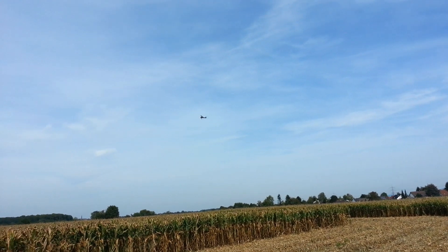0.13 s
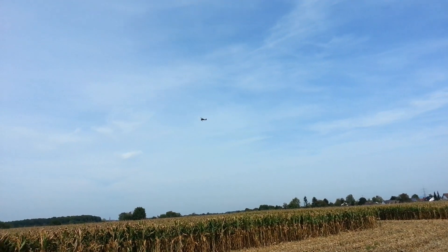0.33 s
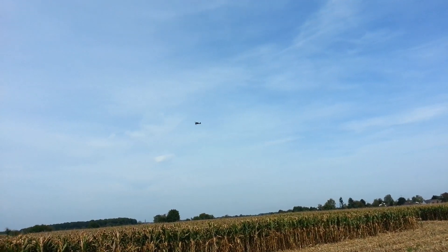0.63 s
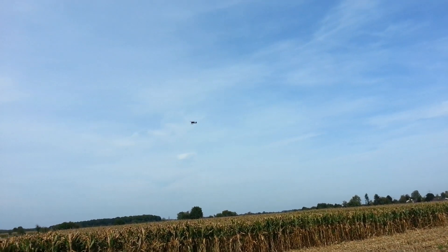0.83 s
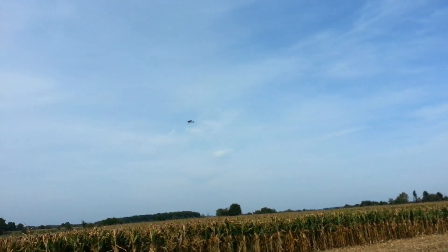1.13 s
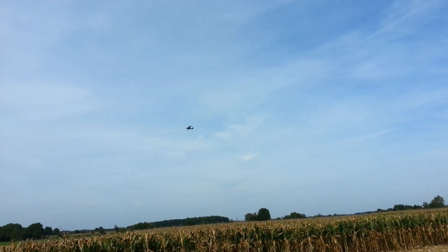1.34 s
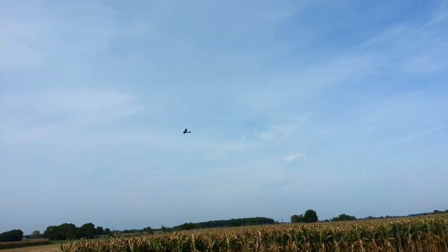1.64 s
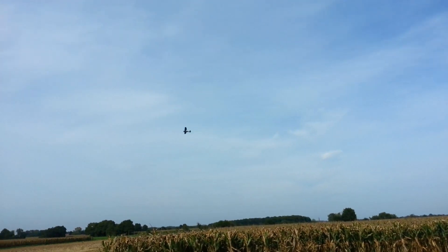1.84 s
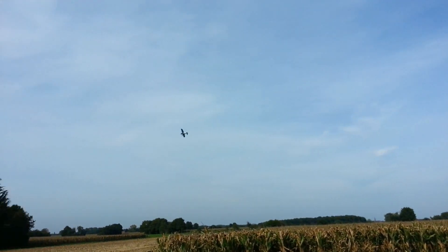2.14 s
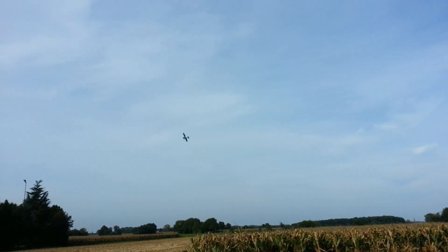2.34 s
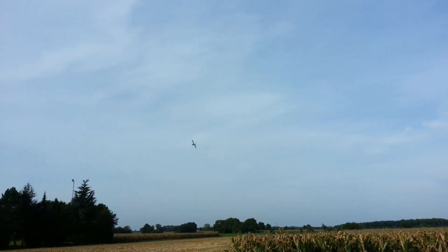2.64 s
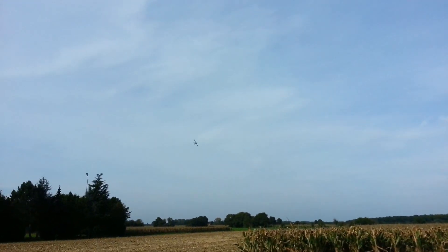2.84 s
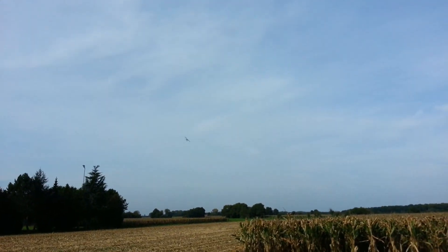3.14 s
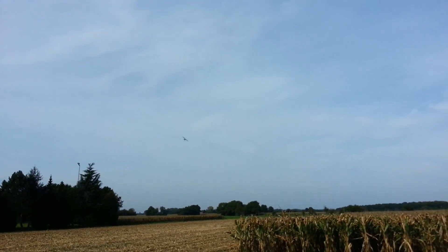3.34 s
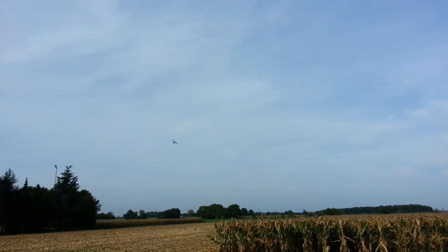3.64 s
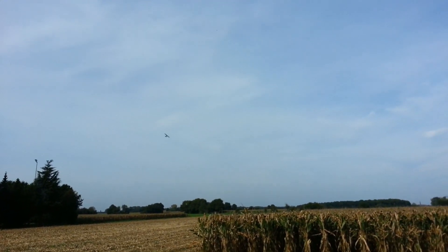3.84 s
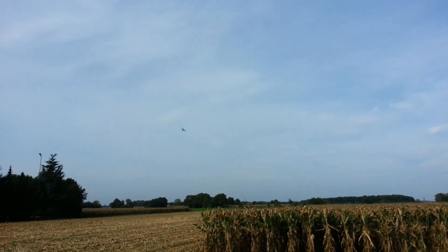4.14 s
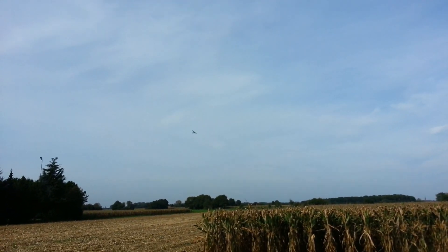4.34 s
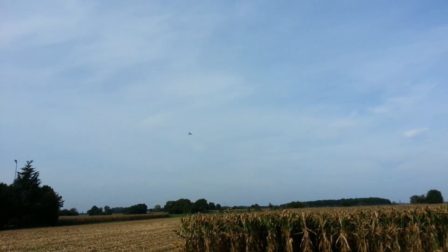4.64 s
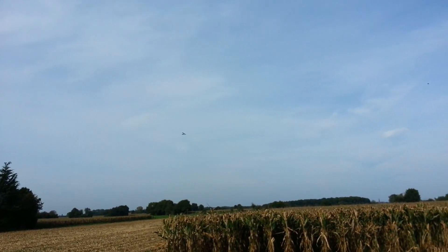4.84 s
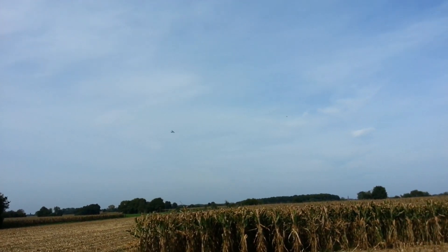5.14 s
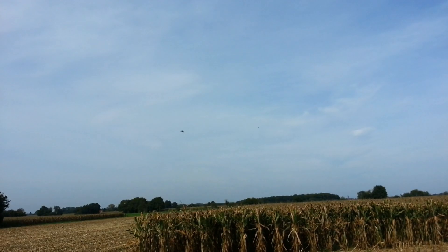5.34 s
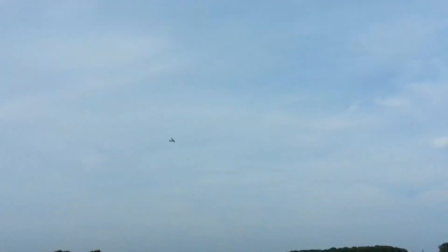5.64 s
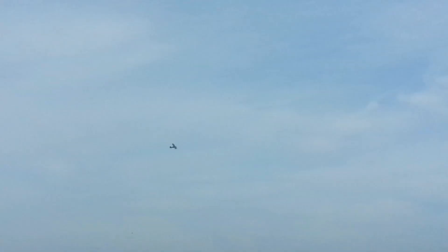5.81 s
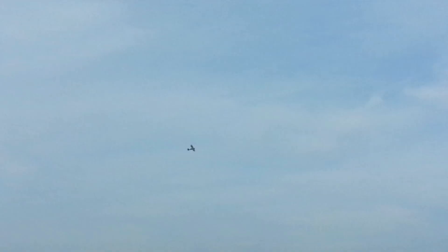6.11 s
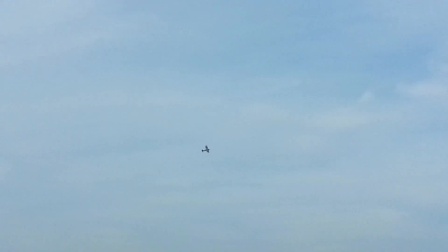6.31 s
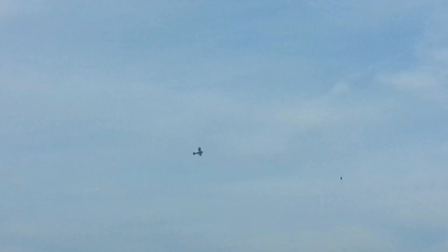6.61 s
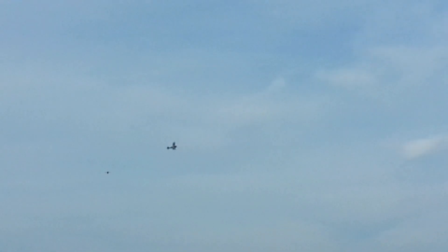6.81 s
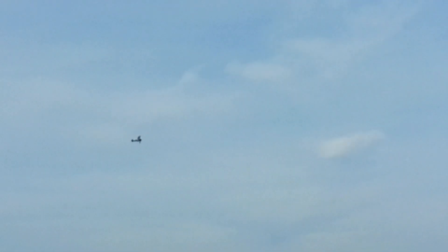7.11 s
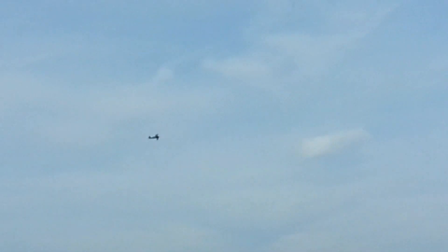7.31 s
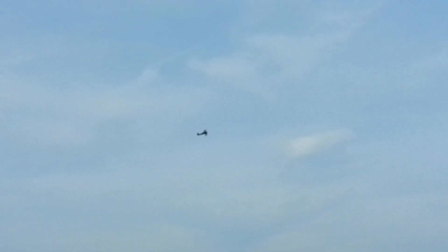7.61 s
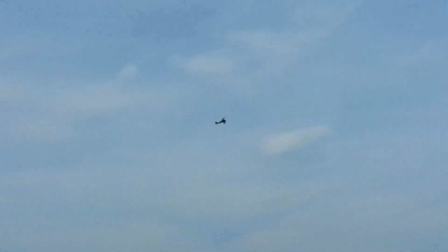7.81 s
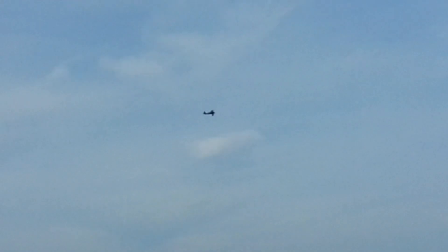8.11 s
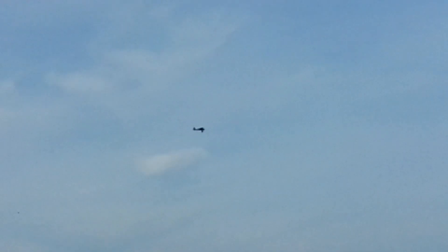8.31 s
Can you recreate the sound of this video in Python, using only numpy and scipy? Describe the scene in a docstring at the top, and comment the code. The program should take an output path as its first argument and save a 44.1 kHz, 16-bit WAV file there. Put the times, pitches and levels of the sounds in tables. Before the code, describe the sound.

A car passes close behind a hand-held microphone on a country road. Its tyres roar on rough tarmac, swelling as it jolts and rattles over bumps, with a low exhaust boom, then fading as it rolls far away. Fingers tick and slide on the casing. In the second half a breeze thumps on the left side and a distant model plane whines very faintly over a soft hiss.

```python
"""On a country road, a car passes behind a hand-held camera and rolls far away. Its tyres roar on the
rough tarmac, it jolts and rattles over bumps, its exhaust booms and its engine hums. The roar reaches
one of the camera's two microphone ports (small openings) first, then the other. Fingers tick and slide
on the camera shell, a breeze thumps on the left port, a far model plane whines and the microphone
hisses."""
import sys
import numpy as np
from scipy import signal
from scipy.fft import rfft, irfft, next_fast_len
from scipy.io import wavfile
from scipy.ndimage import uniform_filter1d, map_coordinates

SR = 44100
rng = np.random.default_rng(int(sys.argv[2]) if len(sys.argv) > 2 else 0)


def dump(signal):
    """Clip the signal to [-1, 1] and save it as 16-bit WAV at the path in sys.argv[1]."""
    limited = np.clip(np.atleast_2d(signal).T, -1, 1)
    pcm = np.round(limited * 32767).astype(np.int16)
    wavfile.write(sys.argv[1], SR, pcm)


N = 373086


# How loud and how deep or bright the roar is: t/s, level/dB, bass lift/dB, treble lift/dB
ROAR_LEVELS = [(0, -32, 2, -2.5), (.5, -30.5, 1, -2.5), (.8, -27.5, 5, -1), (1.05, -28.5, 8.5, 1.5),
               (1.4, -27.5, 7.5, 2), (1.62, -26.5, 3.5, 0.5), (1.8, -23.5, 4.5, -0.5),
               (1.98, -25.5, 11.5, 1.5), (2.2, -23.5, 6, -0.5), (2.48, -19, -0.5, -2),
               (2.63, -23.5, 2, 2.5), (2.85, -21, 2, 0.5), (3.1, -25.5, -1, 1.5), (3.5, -28, -1.5, 0.5),
               (4.2, -29.5, -1.5, 2.5), (4.45, -29.5, 1.5, 4.5), (5.5, -36, 0, 2), (6.2, -35.5, -3, 1.5),
               (7.2, -36, -2.5, 1), (8.46, -39.5, -3, -1.5)]
# The bass of the roar, alike on both ports: f/Hz, gain/dB
ROAR_BASS = [(20, -33), (60, -28), (130, -11), (220, -3), (300, -1), (360, -2), (440, 2), (520, -1),
             (640, -1.5)]

def car():
    """The roar swells, changes tone and fades as the car comes, passes and leaves."""
    pass_s, abeam_s = 2.26, 0.55  # closest moment; distance to the road divided by speed
    frames = dict(fs=SR, nperseg=2048, noverlap=1536)
    hz, t, spectra = signal.stft(tyres(), **frames)
    f = hz[:, None]
    level_db, bass_db, treble_db = curves(ROAR_LEVELS, t)
    away = (t - pass_s) / np.hypot(t - pass_s, abeam_s)  # -1 coming, 0 closest, 1 leaving
    db, lead = roar_tone(hz, t)
    db += along(ROAR_BASS, hz)[:, None] + bass_db / (1 + (f / 450) ** 4)
    db += treble_db / (1 + (2600 / (f + 1)) ** 6)
    db -= 65 * np.log2(np.maximum(f / 6000, 1))  # air and rubber pass little above 6000 Hz
    db += exhaust_boom(f, t, away) + swelling_bands(f, t) - hand_shade(f, t)
    patches = uniform_filter1d(rng.standard_normal(db.shape[1:]), size=14, axis=0)
    patches = uniform_filter1d(patches, size=12, axis=1)
    gain = amp(db + 0.8 * patches / patches.std())  # the tone flickers a little
    mid_power = np.sum(gain[:, 23:116] ** 2, axis=(0, 1)) / 2 / len(hz)  # about 500-2500 Hz
    gain *= amp(level_db) / np.sqrt(mid_power)
    return signal.istft(reach_ports(spectra, hz, t, away, lead) * gain, **frames)[1][:, :N]


# Jolts over bumps: t/s, jump in level/dB, time to die away by 60 dB/s
BUMPS = [(1.76, 6.5, 0.16), (1.831, 5, 0.091), (1.917, -2, .06), (1.99, 1.5, 0.037), (2.317, 4, 0.071),
         (2.502, 6.5, 0.13), (2.596, 4.5, 0.1), (2.739, 3, 0.074), (2.755, 5, 0.1), (2.841, 6.5, 0.15),
         (2.915, 3.5, 0.12)]
# The car body knocks at the hardest bumps: t/s, level against the roar/dB, f/Hz
BODY_KNOCKS = [(1.7635, 0, 900), (2.5032, 5, 1600), (2.7395, 5, 1300), (2.7585, 0, 900), (2.8430, 14, 1800),
               (2.8436, 0, 1100), (2.8600, -2, 700), (2.919, 2, 1500)]

def tyres():
    """Rough tarmac makes grainy noise that leaps at bumps. Rows: shared, left only, right only."""
    t, surge = np.arange(N) / SR, np.zeros(N)
    for s, db, fade_s in BUMPS:
        surge += (amp(db) - 1) * amp(-60 * np.abs(t - s) / fade_s) * np.clip((t - s) / 0.01, 0, 1)
    grain = amp(1.08 * wobble(320) + 0.47 * wobble(25) + 0.5 * wobble(7))
    roar = unit(grain * rng.standard_normal((3, N)))
    dull_hz, treble_share = 2300, 0.39  # a jolt is dull: only part of the treble leaps
    roar += filtered(surge * roar, lambda f: treble_share + (1 - treble_share) / (1 + (f / dull_hz) ** 6))
    for s, db, hz in BODY_KNOCKS:
        start = round(s * SR)
        roar[:, start:start + 600] += ring(db, hz, t[:600], cycles=5)
    return roar


# The roar's tone at four places on the road: f/Hz, left gain/dB, right gain/dB, left phase lead/rad
TONE_NEARING = [(576, -2.5, -2.5, 0.033), (696, 1.5, 5.5, -0.075), (880, 5, 4, 0.26), (1100, 6, 5, 0.57),
                (1440, 3.5, 1.1, -0.18), (1810, 5.5, 4.5, -0.27), (2050, -2, -9, -0.08),
                (2240, -5.5, -3.5, -0.94), (2820, -7.5, -8, 0.13), (2890, -6, -5, 0.73),
                (3340, -5, -13.5, -0.95), (4340, -10.5, -13, -0.51), (5110, -12, -16.5, 0.78),
                (5900, -36, -19, -0.13)]
TONE_PASSED = [(544, -3.5, -3, 0.0), (735, 4.5, 5, 0.94), (890, 2.5, 2.5, 0), (1100, 1.5, 6.5, 0.5),
               (1380, -4, 0, 1.8), (1730, 0, -7, 0.35), (2060, -3.5, -6.5, 0.0), (2400, -15.5, -10, 0),
               (2680, -6, -21, -0.3), (2980, -12, -26, 7), (3470, -10.5, -11.5, -0.5),
               (4270, -10, -15.5, -1), (5140, -24, -26.5, 2), (6000, -33, -24.5, 3.5)]
TONE_LEAVING = [(560, 0.8, 1, -0.0052), (726, 1.5, -1.5, -0.86), (900, -3.5, 6, -0.18),
                (1130, 3, 8.5, 0.21), (1390, -1, 3, -0.12), (1790, 1, 2.5, -0.61), (2070, -8.5, -1, 0.1),
                (2410, -9, -6.5, 0.58), (2730, -14, -18, 0.6), (2970, -9.5, -21.5, 0.32),
                (3430, -10.5, -22.5, -0.6), (4270, -13, -17.5, 1), (5120, -21, -30, -0.46),
                (6000, -23.5, -27.5, -1.1)]
TONE_FAR = [(600, 0, 1, -0.094), (695, 0, 3.5, -0.57), (870, 2.5, 4, 0.17), (1080, 3.5, 2, 0.27),
            (1360, 3.5, 3.5, -0.55), (1770, -10, -5, -0.058), (2010, -5.5, -3, 1), (2360, -5, -10, 0.56),
            (2680, -10.5, -12, -0.35), (2900, -12, -12, -0.35), (3420, -12.5, -22, -0.85),
            (4110, -13.5, -19.5, -1.34), (4860, -20, -24.5, -1.6), (6000, -35, -28.5, -2)]
# When each of those tones is fully reached: t/s
TONE_TIMES = [1.7, 2.35, 3.7, 6.6]

def roar_tone(hz, t):
    """One tone blends into the next as the car moves along the road."""
    tones = (TONE_NEARING, TONE_PASSED, TONE_LEAVING, TONE_FAR)
    place = np.interp(t, TONE_TIMES, np.arange(len(tones)))
    weights = [np.clip(1 - np.abs(place - k), 0, 1) for k in range(len(tones))]
    left_db, right_db, lead = sum(along(tone, hz)[..., None] * w for tone, w in zip(tones, weights))
    return np.array([left_db, right_db]), lead


# Strength of the boom with the car coming, closest and leaving: lift/dB
BOOM_LIFTS = [13, 8, 11.5]

def exhaust_boom(f, t, away):
    """The exhaust lifts one narrow, wavering bass band, lower once the car has passed (Doppler effect)."""
    boom_hz, doppler = 308, 0.05  # pitch when closest; car speed divided by the speed of sound
    samples = np.minimum(t * SR, N - 1).astype(int)
    lift_db = np.interp(away, [-1, 0, 1], BOOM_LIFTS) + 1.5 * wobble(3)[samples]
    pitch_hz = boom_hz * (1 - doppler * away) + 4 * wobble(4)[samples]
    return lift_db * bell(f - pitch_hz, width=20)


# Three bands of the roar: t/s, left f/Hz, right f/Hz, left lift/dB, right lift/dB
LOW_SWELL = [(.2, 1750, 1800, 3, 0), (1, 1760, 1740, 4, 6), (1.9, 1790, 1750, -0.5, 4),
             (2.15, 900, 835, 5.5, 4), (2.6, 1150, 1350, 6, 3.5), (2.9, 1520, 1490, 2.5, 1.5),
             (3.5, 1520, 1760, 2, 2.5), (4.2, 1590, 1950, 2, 1), (4.6, 1200, 1070, 4, 2),
             (5.8, 1100, 1000, 2.5, 0), (6.5, 1100, 2060, -1, 0), (7.3, 980, 1000, 2.5, 0.5),
             (7.9, 1030, 1010, 4, 3), (8.4, 1530, 1720, 3.5, 3.5)]
MID_SWELL = [(.2, 3200, 3280, 1, 8), (.7, 3760, 3260, -10, 5), (1.1, 3500, 3300, -9, 2),
             (1.6, 3200, 3300, -1.5, 2.5), (2.1, 3200, 3300, 1.5, 1.5), (2.8, 3200, 3500, -1, -3),
             (3.5, 3400, 3480, 0, 9), (4.1, 3200, 3500, 1, 10), (4.4, 3100, 3500, 1, 12),
             (4.75, 3300, 3800, -7, 1), (5.1, 3500, 3600, 2.5, 2), (5.6, 3550, 3500, 7.5, 11),
             (6.2, 3400, 3500, -1.5, 4), (7.1, 3000, 3500, 1, 7), (7.6, 2860, 3380, 12.5, 12),
             (8.1, 2800, 3200, 4, 4)]
HIGH_SWELL = [(.2, 4500, 4500, 1, 3), (.6, 4770, 4300, -16, 2), (1, 4400, 4800, -2, 4),
              (1.35, 4400, 4350, -3, 5.5), (1.8, 4500, 4520, -8, 5.5), (2.3, 4000, 4300, 2.5, 1),
              (2.8, 4470, 4900, -4.5, -6), (3.5, 4330, 4480, 4.5, 3), (3.9, 4210, 4600, 2.5, 1),
              (4.35, 4070, 4600, 3.5, 3), (4.75, 4270, 4300, -7, -6), (5.3, 4380, 4300, 1, -2),
              (5.7, 4500, 4250, 6.5, 7), (6.3, 4330, 4500, 0, -1), (7.1, 4050, 4300, 6, 5),
              (7.6, 4200, 4400, 1.5, 3), (8.1, 4700, 4500, 5.5, 9)]
# How far each band spreads, low to high: width/Hz
SWELL_WIDTHS = [460, 280, 490]

def swelling_bands(f, t):
    """Parts of the roar swell and slide in pitch as the car and the camera move."""
    bands = zip((LOW_SWELL, MID_SWELL, HIGH_SWELL), SWELL_WIDTHS)
    return sum(moving_band(rows, f, t, width_hz) for rows, width_hz in bands)


# The dip made by the hand (below 0, a lift): t/s, left f/Hz, right f/Hz, left depth/dB, right depth/dB
HAND_DIP = [(.3, 2600, 1400, -3, 5), (1.1, 2600, 1400, 4, -0.5), (2.1, 2500, 2880, 6, -2),
            (2.5, 2500, 2920, -5, -7), (3.1, 2650, 2900, 1, -8), (4.6, 2920, 3040, 4, -1),
            (5.4, 2900, 3160, -2.5, -4), (6.4, 2720, 3000, 5, 16), (7.2, 2600, 2500, 7, 4),
            (8.46, 2630, 2330, 4, 5)]

def hand_shade(f, t):
    """The hand shades each port from one band of the roar, which slides as the camera turns."""
    return moving_band(HAND_DIP, f, t, width_hz=255)


# How much later the left port hears the car (below 0, earlier): t/s, delay/ms
LEFT_DELAY = [(0, .15), (.6, .21), (1.8, .22), (2.0, .15), (2.2, -.22), (2.4, -.31), (2.8, -.38),
              (4.2, -.45), (6, -.455), (8.46, -.41)]
# Higher sounds mostly scatter more: f/Hz, factor on the scattered share
SCATTERING = [(300, .4), (1100, .5), (1500, 1.2), (3000, 5.), (4200, 4.), (6000, 10.)]

def reach_ports(spectra, hz, t, away, lead):
    """Direct sound reaches one port first; sound scattered by crops and the hand differs at each."""
    delay_ms, = curves(LEFT_DELAY, t)
    far_share, near_share = 0.028, 0.2
    share = far_share + (near_share - far_share) * (1 - away ** 2) ** 2
    scattered = np.clip(share * along(SCATTERING, hz)[:, None], 0, 1)
    shift = np.exp(1j * (lead / 2 - np.pi * hz[:, None] * delay_ms / 1000))  # half for each port
    direct = spectra[0] * np.array([shift, 1 / shift])
    return np.sqrt(1 - scattered) * direct + np.sqrt(scattered) * spectra[1:]


# The engine's note: t/s, f/Hz, level/dB
ENGINE_NOTE = [(2.1, 70.3, -81), (2.3, 69, -55), (2.65, 66.5, -62), (3.5, 67.3, -62), (4.2, 66.5, -72),
               (4.8, 66, -77), (5.2, 67.5, -100)]

def engine():
    """The engine's firing makes a low hum, heard as the car draws away."""
    hz, db = curves(ENGINE_NOTE, np.arange(N) / SR)
    return np.sqrt(2) * amp(db + 2 * wobble(3.7)) * np.sin(2 * np.pi * np.cumsum(hz) / SR)


# Sharp ticks of fingers on the camera shell: t/s, snap level/dB, snap left over right/dB, # knock level/dB,
# knock left over right/dB, knock f/Hz, ping level/dB, ping f/Hz
SHELL_TICKS = [(1.818, -44, -6, -21, 0, 3600, -50, 5000), (1.848, -39, -10, -19, 2, 3700, -22, 4900),
               (1.852, -42, -10, -20, 0, 3600, -26, 4900), (3.1242, -10, 9, -6, -5, 2300, -9, 4900),
               (3.1436, -13, -7, -12, -18, 1500, -13, 3600),
               (3.1535, -60, 0, -17, 0, 1400, -50, 5000), (3.4096, -37, -6, -40, 0, 2000, -50, 5000),
               (3.4704, -21, -10, -34, -6, 4000, -24, 5000),
               (3.8518, -46, -8, -15, -4, 2200, -38, 9500),
               (4.0752, -50, -4, -30, -4, 8500, -50, 5000), (4.363, -40, 5, -32, 5, 9800, -50, 5000),
               (4.367, -36, 4, -24, 0, 2100, -32, 9800), (4.3752, -20, 9, -13, 5, 2800, -50, 5000),
               (4.3757, -50, 0, -13, -10, 1700, -50, 5000),
               (4.3763, -50, 0, -19, -14, 600, -50, 5000), (4.4838, -44, 4, -30, 2, 7500, -50, 5000)]
# The tone of a snap: f/Hz, gain/dB
SNAP_TONE = [(1500, -24), (3000, 3), (5000, 4), (7000, 3), (11000, 3), (14200, 1), (15200, -14),
             (16000, -30)]

def shell_ticks():
    """Each small hit makes a bright snap, a short knock and a ping that is louder on the right."""
    snaps, knocks, t = np.zeros((2, N)), np.zeros((2, N)), np.arange(500) / SR
    fade_s, right_dull_hz = 0.0038, 11000
    for s, snap_db, pan_db, knock_db, knock_pan_db, knock_hz, ping_db, ping_hz in SHELL_TICKS:
        at = slice(round(s * SR), round(s * SR) + len(t))
        noise = unit(rng.standard_normal((2, len(t))))
        snaps[:, at] += amp(snap_db - 60 * t / fade_s) * noise * sides(pan_db)
        knocks[:, at] += ring(knock_db, knock_hz, t, cycles=7) * sides(knock_pan_db)
        knocks[:, at] += ring(ping_db, ping_hz, t, cycles=20) * amp([[-12], [0]])
    snaps = filtered(snaps, lambda f: amp(along(SNAP_TONE, f)))
    snaps[1] = filtered(snaps[1], lambda f: 1 / (1 + (f / right_dull_hz) ** 8))
    return snaps + filtered(knocks, lambda f: f ** 2 / (f ** 2 + 250 ** 2))  # knocks lose their bass


# Finger slides: start t/s, end t/s, rub level/dB, left over right/dB, scrape level/dB
FINGER_SLIDES = [(1.607, 1.655, -56, -7, -65), (4.376, 4.46, -45, 9, -32), (8.128, 8.236, -51, 3, -54)]
# The tones of the rub and the scrape: f/Hz, gain/dB
RUB_TONE = [(3000, -27), (4200, 0), (6500, -9), (10000, 0), (14200, -5), (14800, -60)]
SCRAPE_TONE = [(200, -25), (500, 0.5), (1100, -6), (2500, -25), (4200, -9.5), (5500, -24), (8000, -70)]

def finger_slides():
    """A sliding finger rubs with a soft hiss, while a duller scrape comes through the shell."""
    t, slides = np.arange(N) / SR, np.zeros((2, N))
    rise_s, fall_s = 0.012, 0.065
    rub, scrape = shaped_noise(RUB_TONE), shaped_noise(SCRAPE_TONE)
    for start, end, rub_db, pan_db, scrape_db in FINGER_SLIDES:
        touch = np.clip(np.minimum((t - start) / rise_s, (end - t) / fall_s), 0, 1)
        slides += (amp(rub_db) * rub + amp(scrape_db) * scrape) * sides(pan_db) * touch
    return slides


# Gusts on the left port: t/s, half length/s, level/dB
WIND_GUSTS = [(4.35, .08, -53), (4.75, .08, -67), (5.27, 0.046, -43), (5.603, 0.16, -53), (6.1, .05, -64),
              (6.34, 0.077, -49), (6.703, 0.036, -49), (7.116, 0.28, -44.5), (7.53, 0.038, -39.5),
              (7.75, 0.22, -43.5), (8.115, 0.04, -52), (8.34, 0.098, -56.5)]
# The tone of wind on a port: f/Hz, gain/dB
WIND_TONE = [(20, -26), (50, -4), (100, 7), (180, 8), (300, -5.5), (500, -44), (900, -62)]
# Single swirls of air that thump on the left port: t/s, level/dB, f/Hz
WIND_THUMPS = [(4.778, -26, 228), (5.268, -27.5, 150), (5.622, -30, 281), (6.743, -28, 216),
               (7.01, -28, 205), (7.068, -23, 145), (7.076, -28, 280), (7.156, -28, 228), (7.19, -33, 200),
               (7.531, -18, 243), (7.557, -26, 232), (7.675, -29, 188), (7.718, -22, 247),
               (7.731, -23, 230), (7.743, -28, 187)]

def breeze():
    """Gusts hit the left port in lumps and single thumps; the right port is sheltered."""
    t = np.arange(N) / SR
    calm_db, sheltered_db = -68.5, -16
    strength = amp(calm_db) + sum(amp(db) * bell(t - s, half_s) for s, half_s, db in WIND_GUSTS)
    lumps = amp(2.3 * np.array([wobble(22), wobble(22)]))
    air = strength * shaped_noise(WIND_TONE, lumps)
    around = np.arange(-600, 600) / SR  # time from the middle of a thump
    for s, db, hz in WIND_THUMPS:
        middle = round(s * SR)
        wave = np.sin(2 * np.pi * hz * around + rng.uniform(0, 2 * np.pi))
        air[:, middle - 600:middle + 600] += amp(db) * bell(around, 0.52 / hz) * wave
    return air * amp([[0], [sheltered_db]])


# The model plane's motor: t/s, shaft f/Hz, level/dB
PLANE_MOTOR = [(5.4, 163.5, -87), (5.8, 164.3, -68), (6.8, 168, -65.5), (7.25, 171.5, -64),
               (8.46, 172, -63.5)]

def model_plane():
    """The far motor whines at 6 and 7 times its turning rate, rising as the plane turns back."""
    hz, db = curves(PLANE_MOTOR, np.arange(N) / SR)
    angle = 2 * np.pi * np.cumsum(hz + 0.4 * wobble(12)) / SR
    return np.sqrt(2) * amp(db + 3 * wobble(7)) * (np.sin(7 * angle) + amp(-6) * np.sin(6 * angle))


# How loud the lower hiss is: t/s, level/dB
LOW_HISS_LEVELS = [(0, -64.5), (1.1, -59), (1.6, -57), (1.77, -53.5), (2, -63), (2.2, -61.5), (2.45, -50.5),
                   (2.8, -53), (3.25, -58.5), (4.5, -60.5), (8.46, -65)]
# The tones of the lower and the top hiss: f/Hz, gain/dB
LOW_HISS_TONE = [(4500, -40), (5500, -22), (6500, 1.5), (7500, 0.5), (9000, -3.5), (10200, -19),
                 (12000, -66)]
TOP_HISS_TONE = [(8500, -19), (9500, -3.5), (12000, -3.5), (14400, -6.5), (14700, -57)]
# A faint, thin whistle: t/s, level/dB
WHISTLE_LEVELS = [(0, -74), (.9, -75), (1.7, -80), (1.9, -100), (8.1, -100), (8.2, -78), (8.46, -72)]

def hiss():
    """A steady hiss, the roar's airy edge and a faint whistle; the top hiss thins out while the car is loud."""
    t = np.arange(N) / SR
    loud_db = np.maximum(curves(ROAR_LEVELS, t)[0] + 34, 0)  # how far the roar is above -34 dB
    lower = amp(curves(LOW_HISS_LEVELS, t)[0]) * shaped_noise(LOW_HISS_TONE)
    top = amp(-61 - 0.2 * loud_db ** 2) * shaped_noise(TOP_HISS_TONE)
    whistle = np.sqrt(2) * amp(curves(WHISTLE_LEVELS, t)[0]) * np.sin(2 * np.pi * 7780 * t)
    return lower + top + whistle


def amp(db):
    """Turn decibels into a factor to multiply by."""
    return 10 ** (np.asarray(db) / 20)


def unit(x):
    """Scale each row to an average power of 1."""
    return x / np.sqrt(np.mean(x ** 2, axis=-1, keepdims=True) + 1e-20)


def along(points, hz):
    """Read a table's columns at the frequencies hz, on a log scale."""
    f, *cols = np.transpose(points)
    return np.squeeze([np.interp(np.log(hz + 1), np.log(f + 1), c) for c in cols])


def curves(rows, t):
    """Read a table's columns at the times t."""
    s, *cols = np.transpose(rows)
    return [np.interp(t, s, c) for c in cols]


def bell(x, width):
    """A smooth hump, 1 high at x = 0."""
    return np.exp(-(x / width) ** 2)


def moving_band(rows, f, t, width_hz):
    """A hump in dB for each port, whose pitch and height follow a table."""
    centre_hz, db = np.reshape(curves(rows, t), (2, 2, 1, -1))
    return db * bell(f - centre_hz, width_hz)


def wobble(rate):
    """A smooth curve through `rate` random points a second."""
    return map_coordinates(rng.standard_normal(int(N * rate / SR) + 4), [np.arange(N) * rate / SR])


def filtered(x, response):
    """Multiply each frequency f in x by response(f)."""
    size = next_fast_len(N + SR // 2)
    return irfft(rfft(x, size) * response(np.fft.rfftfreq(size, 1 / SR)), size)[..., :N]


def shaped_noise(tone, swell=1):
    """Separate noise for each port, with its tone taken from a table."""
    return unit(filtered(swell * rng.standard_normal((2, N)), lambda f: amp(along(tone, f))))


def sides(db):
    """Left and right gains that make the left louder by db."""
    return amp([[db / 2], [-db / 2]])


def ring(db, hz, t, cycles):
    """A struck part rings, dying away by 60 dB over `cycles` swings."""
    onset = 1 - np.exp(-t / 0.0003)
    return 2 * amp(db - 60 * t * hz / cycles) * onset * np.sin(2 * np.pi * hz * t)


def scene():
    """All the sounds add up at the two ports."""
    return car() + engine() + model_plane() + shell_ticks() + finger_slides() + breeze() + hiss()


def record(dry):
    """The camera keeps nothing above 15950 Hz."""
    return filtered(dry, lambda hz: hz < 15950)


dry = scene()
out = record(dry)
dump(out)
```